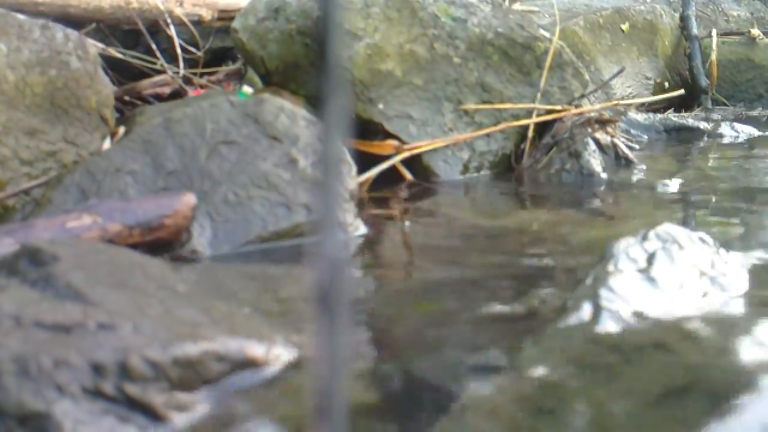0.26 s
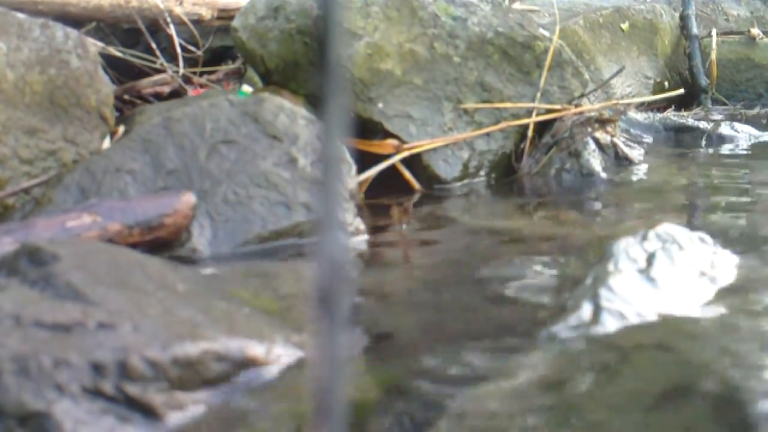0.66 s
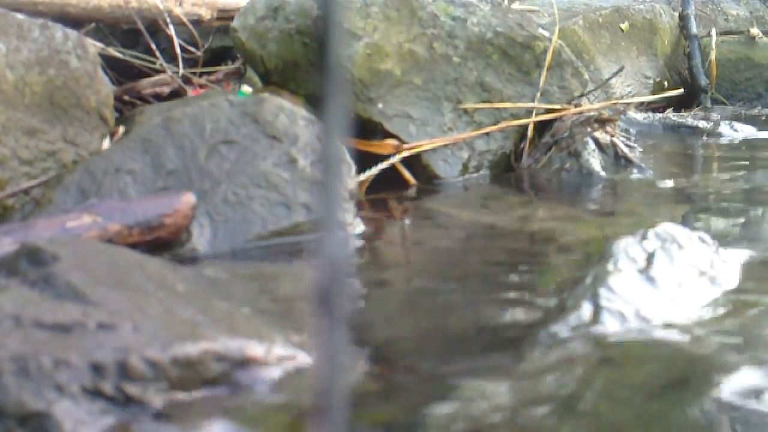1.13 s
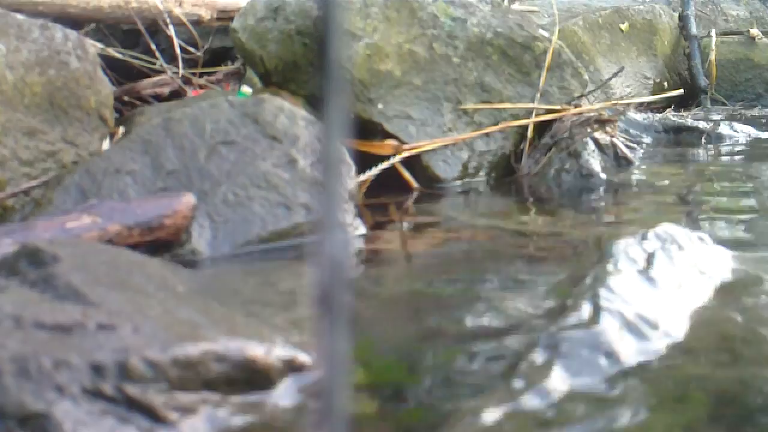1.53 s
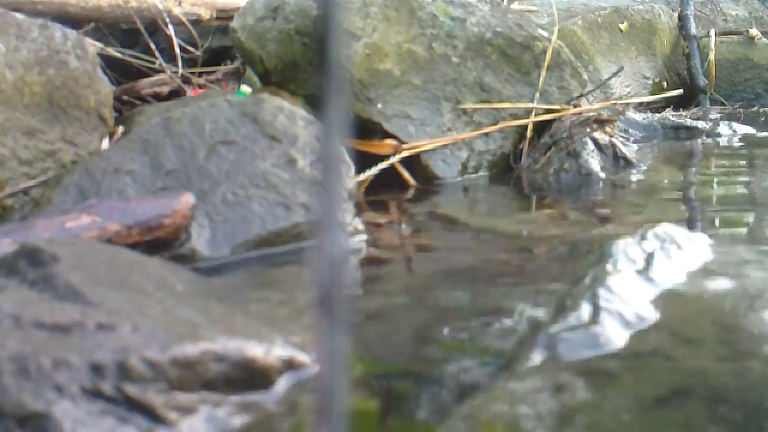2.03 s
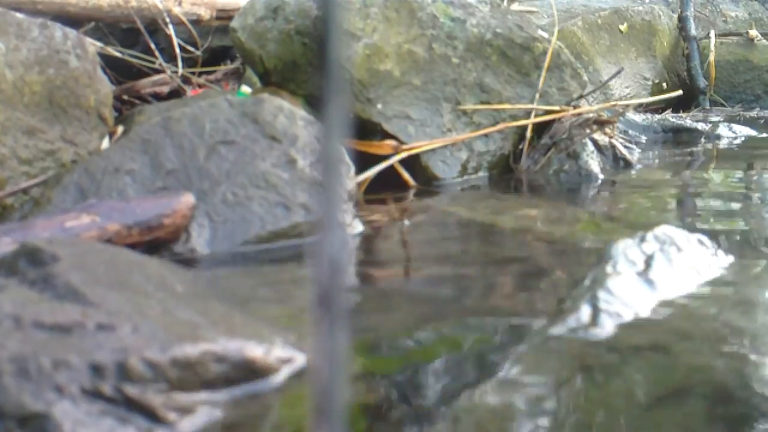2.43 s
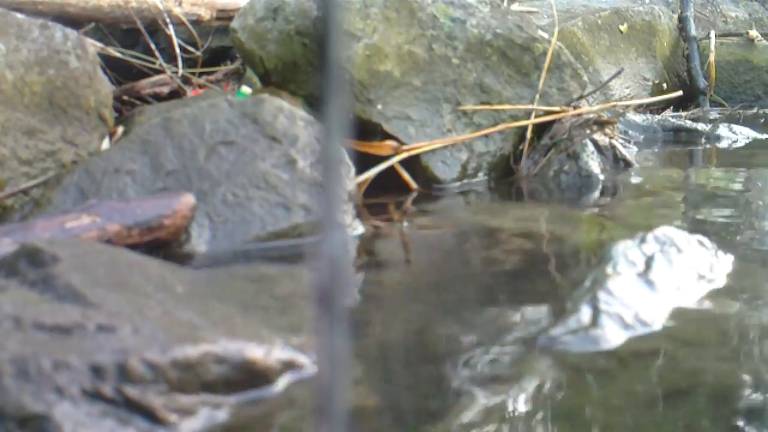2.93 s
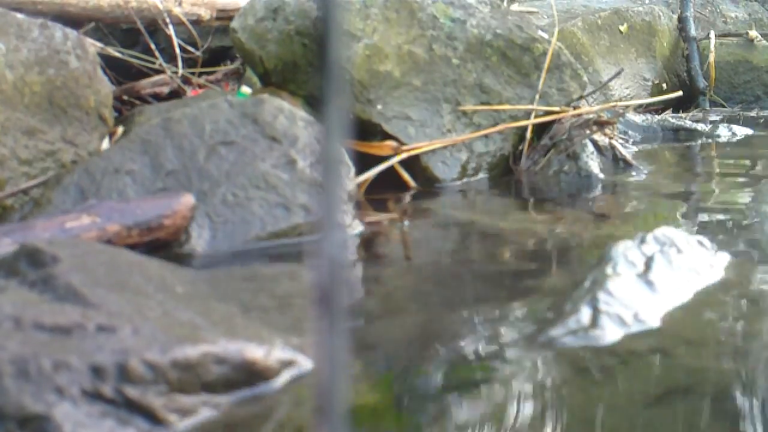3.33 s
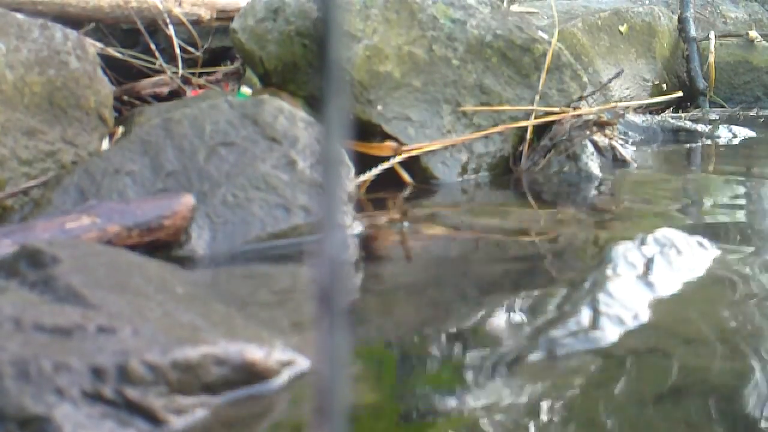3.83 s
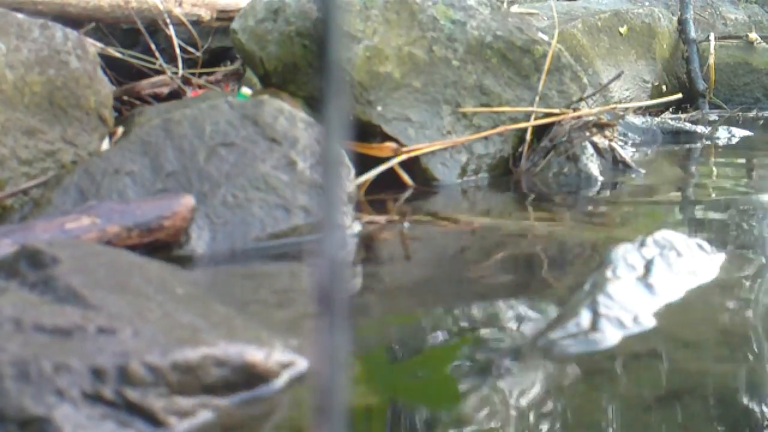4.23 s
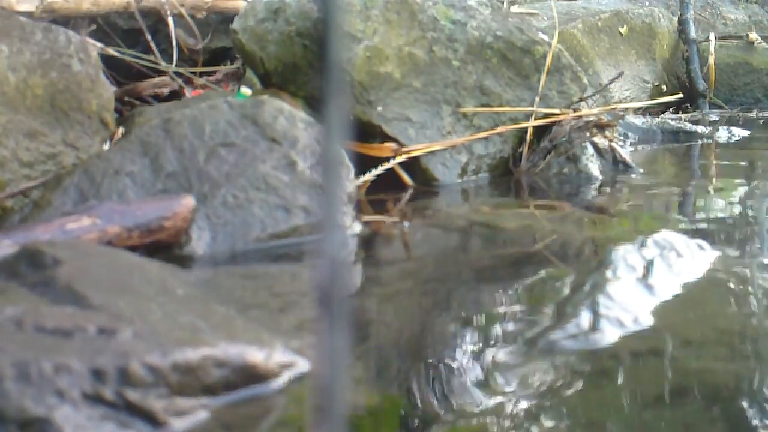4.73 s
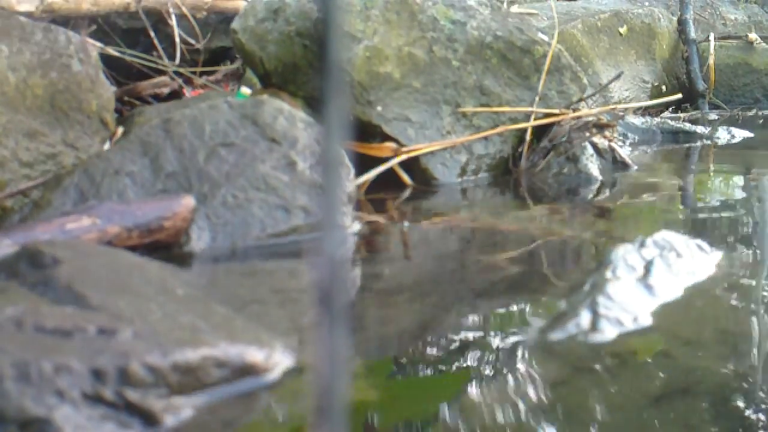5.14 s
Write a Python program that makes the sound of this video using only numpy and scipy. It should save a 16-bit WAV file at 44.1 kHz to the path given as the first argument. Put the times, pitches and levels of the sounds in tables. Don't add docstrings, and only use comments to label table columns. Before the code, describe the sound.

A steady, high, pure electronic whine, around 1.6 kHz with a weaker octave, runs through the whole 5.4 seconds, swelling only very slightly, with a faint fast ticking beneath. Low wind rumble and soft hiss surround it. A distant engine hums low at the start, fades by 1.5 s, and returns from about 4 s, slightly higher. Water laps quietly at hollow floats by the rocks; a soft knock comes near 0.8 s, tiny droplet ticks at 1.2-1.4 s, a slap at 1.65 s and a firmer hollow knock near 2.15 s. From 2.8 to 3.15 s splashes thicken with knocks, froth and crisp spray. Quick slaps follow at 3.35-3.6 s, then wet bubbly knocks around 3.85 and 4.05 s and spatter at 4.3-4.4 s. The loudest event, a clustered deep hollow thump with cracks, lands at 4.6-4.7 s, then lapping subsides. The microphone is close, on the craft.

```python
import sys
import numpy as np
from scipy import signal
from scipy.fft import rfft, irfft
from scipy.io import wavfile
from scipy.ndimage import uniform_filter1d

SR = 44100
rng = np.random.default_rng(int(sys.argv[2]) if len(sys.argv) > 2 else 0)


def invert_db(level):
    return 10 ** (np.asarray(level, dtype=float) / 20)


def wav_record(signal):
    frames = np.transpose(np.atleast_2d(signal))
    bounded = np.clip(frames, -1, 1)
    quanta = np.round(bounded * 32767).astype(np.int16)
    wavfile.write(sys.argv[1], SR, quanta)


N = 237699

# (multiple, level [dB rms])
WHINE_HARMONICS = [(1, -35.9), (2, -50.9), (3, -70.5), (4, -74.5), (5, -74.8), (6, -81)]
# (frequency [Hz], level [dB rms])
CIRCUIT_TONES = [(8077.85, -73), (11088.93, -61)]
SWELL_TIMES_S = [0.287, 0.574, 0.773, 1.035, 1.082, 1.345, 1.387, 1.828, 2.028, 2.182, 2.268, 2.422, 2.6,
                 2.731, 2.798, 2.843, 2.953, 3.062, 3.104, 4.316, 4.845, 4.958, 5.154, 5.196]
SWITCH_HZ, UPDATE_HZ, SWELL_DB = 1602.53, 45.4, 2

# (time [s], frequency [Hz], level [dB rms])
ENGINE_CURVE = [
    (0, 158, -53.5),
    (1.5, 163, -66.5),
    (3, 169, -65.5),
    (4.2, 174, -48),
    (4.75, 177.3, -46.5),
    (5.39, 180, -46.5),
]
# (frequency [Hz], density [dB per Hz])
AIR_SPECTRUM = [(20, -1), (45, 2), (85, 2), (130, -6.5), (250, -10), (500, -21), (1000, -26.5), (2000, -31),
                (3000, -40.5), (4800, -43.5), (5600, -42), (8000, -45.5), (12000, -40), (15500, -53)]
AIR_DB = -39

# (frequency [Hz], width [Hz], level [dB])
FLOAT_MODES = [(161, 47, 0.5), (307, 132, 3.5), (449, 116, 5.5), (600, 196, -2), (750, 250, -12)]
# (frequency [Hz], width [Hz], level [dB])
SHELL_MODES = [(837, 240, 1), (1170, 83, -2), (1240, 88, -1.5), (2160, 570, -5), (2130, 88, 1),
               (2920, 570, -23)]
# (frequency [Hz], width [Hz], level [dB])
FROTH_MODES = [(3210, 600, -2.5), (3700, 260, 0.5), (4100, 1300, -3), (4950, 175, 0.5), (6400, 1900, -11)]
# (frequency [Hz], width [Hz], level [dB])
SPRAY_MODES = [(7920, 920, 4), (9160, 1200, 3.5), (10960, 1200, 4), (12800, 810, 7), (13700, 1700, 4.5)]

# (time [s], level [dB])
RIPPLE_CURVE = [(0, -52), (.48, -47.5), (.95, -48.5), (1.15, -43), (1.5, -44), (1.62, -39), (1.86, -47.5),
                (2.3, -41), (2.67, -45.5), (3.2, -41), (3.48, -42.5), (3.66, -63), (4.0, -65), (4.2, -39.5),
                (4.46, -43), (4.6, -50), (4.75, -47.5), (5.39, -52.5)]
# (crest [s], 20 dB fade [s], slosh level [dB], shell patter re slosh [dB])
WAVE_CRESTS = [(.77, -0.1, -44, -14), (.84, 0.7, -45, -30.5), (1.02, 0.27, -43, -16.5),
               (1.09, 0.04, -37, -21), (1.605, 0.02, -33, -16.5), (2.01, 0.12, -37, -23),
               (2.08, 3, -53, -20), (2.15, 0.1, -33, -27.5), (2.35, 0.03, -32.5, -19),
               (2.43, -0.2, -38.5, -14), (2.58, 0.05, -37, -14), (2.8, 0.15, -32.5, -14),
               (2.87, 0.06, -27.5, -20), (2.91, 0.04, -30.5, -15), (3.0, 0.06, -36, -17),
               (3.05, 0.1, -33.5, -15.5), (3.12, 0.14, -40, -11), (3.44, 0.07, -35, -12),
               (3.53, 0.13, -32.5, -12), (3.59, 0.03, -29.5, -15), (3.825, 0, -27.5, -16),
               (3.87, 0.1, -23.5, -16), (4.065, 0.04, -32.5, -20), (4.16, 0.2, -43.5, -9),
               (4.28, 0.02, -27.5, -23), (4.4, .08, -34, -12.5), (4.61, 0.06, -36.5, -17),
               (4.637, 0.027, -23, -12), (4.67, -0.01, -27, -30)]
# (crest [s], 20 dB fade [s], spray level [dB], froth re spray [dB])
BREAKING_CRESTS = [(.81, -0.2, -59, -4), (.995, 0, -58, 8), (1.02, 0.05, -55, -6), (1.08, -0.1, -53, -6),
                   (1.36, -0.5, -59, -3), (1.97, 0, -54, -6), (2.02, .05, -58.5, 4.5),
                   (2.155, .05, -50, -5.5), (2.36, .2, -59, -1), (2.58, .12, -58, -5), (2.79, 0.34, -55, 3),
                   (2.87, 0.12, -47, 3.5), (2.91, .08, -44, -1.5), (3.01, 0.1, -50.5, -3),
                   (3.08, -0.2, -59, -13), (3.14, 0.08, -53, -1.5), (3.522, 0.1, -44.5, 1.5),
                   (3.54, 0.12, -50, -17), (3.575, 0.4, -61, -14), (3.82, .08, -43.5, -3.5),
                   (3.865, 0.07, -49, 2.5), (3.9, 0.17, -55.5, -1.5), (4.06, 0.08, -53.5, -1.5),
                   (4.16, 0.1, -57, -1), (4.275, 0.06, -51, -2), (4.3, 0.01, -45, -8),
                   (4.325, .05, -46, -2.5), (4.39, 0.06, -44.5, -5), (4.43, 0.13, -55.5, -5),
                   (4.64, 0.01, -53.5, 5)]
CALM_DB = -47
PATTER_DB, PATTER_FOLLOWS = -63, 0.11
FROTH_DB, FROTH_FOLLOWS = -67, 0.9
SPRAY_DB, SPRAY_FOLLOWS = -63.5, 0.5
WAVE_RISE, SPLASH_RISE = 1, 0.7
CREST_ROUNDING = 1.22

# (time [s], peak [dB], hollow pitch [Hz], t60 [s])
SOFT_KNOCKS = [(0.823, -22.5, 312, 0.019), (2.074, -29, 395, 0.036), (2.126, -21, 353, 0.039),
               (2.802, -19.5, 430, 0.033), (2.849, -24, 540, 0.026), (3.067, -19, 336, 0.018),
               (3.586, -18, 567, 0.015), (3.841, -26, 437, 0.093), (4.055, -24, 420, 0.07),
               (4.273, -23.5, 526, 0.017), (4.62, -13.5, 379, 0.061), (4.626, -12, 325, 0.03),
               (4.657, -16, 279, 0.036), (4.687, -20, 251, 0.094)]
# (time [s], peak [dB], hollow pitch [Hz], t60 [s])
SHARP_SLAPS = [(0.763, -31.5, 490, 0.028), (1.651, -26.5, 323, 0.019), (2.158, -15, 252, 0.021),
               (2.882, -28.5, 384, 0.17), (3.007, -30.5, 518, 0.092), (3.099, -26, 542, 0.044),
               (3.344, -24.5, 490, 0.022), (3.377, -23.5, 465, 0.032), (3.401, -21.5, 375, 0.035),
               (3.537, -26, 580, 0.047), (3.573, -19.5, 214, 0.018), (3.864, -19, 344, 0.046),
               (4.047, -35.5, 420, 0.043), (4.605, -24, 600, 0.015), (4.6345, -20, 195, 0.04)]
# (time [s], peak [dB], frequency [Hz], t60 [s])
HEAVES = [
    (2.151, -27, 133, 0.13),
    (4.623, -20, 90, 0.094),
    (4.66, -22, 125, 0.092),
    (4.668, -23, 245, 0.19),
    (4.689, -24.5, 130, 0.16),
    (3.402, -31, 173, .1),
]
# (time [s], peak [dB], frequency [Hz], t60 [s])
BUBBLE_PINGS = [(.824, -31, 576, 0.043), (.992, -46, 4400, .03), (0.992, -49, 5160, .02),
                (.991, -49, 3610, 0.023), (2.863, -34, 4700, 0.034), (2.877, -29.5, 4630, 0.023),
                (3.067, -33, 3350, .015), (3.345, -30.5, 900, 0.023), (3.38, -47, 2140, 0.043),
                (3.408, -45, 2160, 0.045), (3.445, -43, 954, 0.15), (3.512, -36, 2230, 0.034),
                (3.62, -36, 670, 0.028), (3.812, -40, 2250, .05), (3.858, -40.5, 2280, .05),
                (3.866, -22.5, 824, 0.035), (3.898, -31, 1295, 0.065), (4.055, -45.5, 2130, 0.045),
                (4.607, -21, 600, 0.01), (4.628, -25.5, 1120, 0.023), (4.629, -41, 2080, .03),
                (4.622, -22.5, 705, 0.038), (4.636, -19, 1140, 0.017), (4.636, -30, 1960, 0.026),
                (4.6595, -20.5, 600, 0.013)]
KNOCK_CRACK_DB, SLAP_CRACK_DB = 0, 15.5

# (time [s], peak [dB], low part [dB])
DROPLETS = [(1.205, -37, -47.5), (1.28, -36.5, -65), (1.379, -33, -65), (1.4431, -34, -54),
            (2.2493, -37, -58), (2.768, -34, -54), (2.799, -40, -35), (2.878, -30, -31.5),
            (2.903, -22, -30), (2.923, -38, -45), (2.942, -32, -50), (2.981, -30, -50), (2.9973, -30, -33),
            (3.0074, -44, -52), (3.027, -31, -52), (3.0688, -22, -30.5), (3.1004, -35, -44),
            (3.1258, -35, -42), (3.1384, -31.5, -54), (3.208, -40, -40.5), (3.2134, -35, -47),
            (3.4337, -34, -38), (4.146, -30.5, -41), (4.2055, -39, -45), (4.214, -29.5, -58),
            (4.2941, -33, -55), (4.356, -40, -43), (4.382, -26, -39), (4.5052, -32, -60), (4.605, -33, -50)]
PUFF_DECAY_S, DROPLET_HZ, DROPLET_SCATTER_HZ = 0.0014, 12700, 700


def rms_one(x):
    return x / np.sqrt(np.mean(x ** 2) + 1e-20)


def in_time(rows):
    time_s, *columns = np.transpose(rows)
    return [np.interp(np.arange(N) / SR, time_s, column) for column in columns]


def drift(rate_hz):
    pole = np.exp(-2 * np.pi * rate_hz * 40 / SR)
    noise = rng.standard_normal(N // 40 + 2002)
    slow = signal.lfilter([1], [1, -2 * pole, pole * pole], noise)[2000:]
    return np.interp(np.arange(N) / 40, np.arange(len(slow)), rms_one(slow))


def resonate(x, modes):
    out = 0
    for k, (hz, width_hz, db) in enumerate(modes):
        r = np.exp(-np.pi * width_hz / SR)
        poles = [1, -2 * r * np.cos(2 * np.pi * hz / SR), r * r]
        zeros = [(1 - r * r) / 2, 0, (r * r - 1) / 2]
        out = out + (-1) ** k * invert_db(db) * signal.lfilter(zeros, poles, x)
    return out


def dull(x, hz):
    return signal.sosfilt(signal.butter(2, hz, fs=SR, output="sos"), x)


def whine():
    t = np.arange(N) / SR
    held_db = np.zeros(N)
    half = round(SR / UPDATE_HZ / 2)
    for time_s in SWELL_TIMES_S:
        at = round(time_s * SR)
        held_db[at - half:at + half] = SWELL_DB
    swell_db = uniform_filter1d(held_db, size=400)
    out = sum(invert_db(db) * np.sin(2 * np.pi * hz * t) for hz, db in CIRCUIT_TONES)
    for k, db in WHINE_HARMONICS:
        wobble_db = swell_db + 0.2 * drift(12) if k == 1 else 0.9 * drift(3)
        out = out + invert_db(db + wobble_db) * np.sin(2 * np.pi * k * SWITCH_HZ * t + k)
    return np.sqrt(2) * out


def chatter():
    updates = np.diff(np.floor(np.arange(N) / SR * UPDATE_HZ + 0.6), prepend=0)
    jolts = signal.lfilter([1], [1, -0.99], updates * invert_db(3.5 * drift(29)))
    puffs = jolts * rng.standard_normal(N)
    casing = [(2580, 1450, 0)]
    return invert_db(-65.5) * rms_one(resonate(resonate(puffs, casing), casing))


def drone():
    hz, db = in_time(ENGINE_CURVE)
    return np.sqrt(2) * invert_db(db + 1.2 * drift(3)) * np.sin(2 * np.pi * np.cumsum(hz) / SR)


def background():
    hz = np.fft.rfftfreq(N, 1 / SR)
    curve_hz, curve_db = np.transpose(AIR_SPECTRUM)
    colour = invert_db(np.interp(np.log(hz + 1), np.log(curve_hz), curve_db))
    air = rms_one(irfft(rfft(rng.standard_normal(N)) * colour * (hz > 15), N))
    rumble = dull(air, hz=194)
    return invert_db(AIR_DB) * (air + rumble * (invert_db(0.89 * drift(15)) - 1))


def grains(per_s, spread_db):
    sizes = invert_db(spread_db * np.minimum(rng.exponential(1, N), 4)) * rng.choice([-1, 1], N)
    return sizes * (rng.random(N) < per_s / SR) + 1e-18


def patter(per_s, spread_db, modes, patchy_db):
    shared = grains(per_s, spread_db)
    out = 0
    for k, mode in enumerate(modes):
        fed = shared + 1.49 * np.roll(shared, 9973 * (k + 1))
        out = out + (-1) ** k * resonate(fed, [mode]) * invert_db(patchy_db * drift(9))
    return rms_one(out)


def surges(rows, rise, between_db):
    t = np.arange(N) / SR
    power = invert_db(np.array(between_db)) ** 2
    for crest_s, fade_s, db, second_db in rows:
        distance_s = np.maximum(t - crest_s, (crest_s - t) / rise)
        fall_db = -20 * (distance_s / max(fade_s, 0.01)) ** CREST_ROUNDING
        surge = invert_db(np.maximum(fall_db, -80) + db) ** 2
        power = power + surge * [[1], [invert_db(second_db) ** 2]]
    return np.sqrt(power)


def lapping():
    ripple_db, = in_time(RIPPLE_CURVE)
    swing_db = ripple_db - CALM_DB
    patter_db = PATTER_DB + PATTER_FOLLOWS * swing_db
    spray_db = SPRAY_DB + SPRAY_FOLLOWS * swing_db
    froth_db = FROTH_DB + FROTH_FOLLOWS * swing_db
    slosh, shell = surges(WAVE_CRESTS, WAVE_RISE, [ripple_db, patter_db])
    spray, froth = surges(BREAKING_CRESTS, SPLASH_RISE, [spray_db, froth_db])
    clumps = drift(45)
    slosh = slosh * dull(patter(500, 3.7, FLOAT_MODES, patchy_db=0.5), hz=1010) * invert_db(2.4 * clumps - 4)
    shell = shell * dull(patter(600, 2.15, SHELL_MODES, patchy_db=4.5), hz=2630) * invert_db(2.7 * clumps + 1)
    froth = froth * patter(1500, 4, FROTH_MODES, patchy_db=2) * invert_db(2 * clumps)
    spray = spray * patter(4000, 5, SPRAY_MODES, patchy_db=1.5) * invert_db(1.75 * clumps + 1)
    return slosh + shell + froth + spray


def add_ring(out, time_s, db, hz, t60_s, rise_s):
    t = np.arange(SR // 4) / SR
    shape = (1 - np.exp(-t / rise_s)) ** 2 * invert_db(-60 * t / max(t60_s, 0.01))
    out[round(time_s * SR):][:len(t)] += invert_db(db) * shape / shape.max() * np.sin(2 * np.pi * hz * t)


def knocks():
    out = np.zeros(N)
    cracks = np.zeros(N) + 1e-18
    for blows, crack_db in (SOFT_KNOCKS, KNOCK_CRACK_DB), (SHARP_SLAPS, SLAP_CRACK_DB):
        for time_s, db, hz, t60_s in blows:
            add_ring(out, time_s, db, hz, t60_s, rise_s=0.00076)
            cracks[round(time_s * SR) + 90] = invert_db(db + crack_db)
    for heave in HEAVES:
        add_ring(out, *heave, rise_s=0.0012)
    for ping in BUBBLE_PINGS:
        add_ring(out, *ping, rise_s=0.00049)
    return out + dull(resonate(cracks, SHELL_MODES), hz=2570)


def ticks():
    high = np.zeros(N)
    low = np.zeros(N) + 1e-18
    t = np.arange(900) / SR
    for time_s, db, low_db in DROPLETS:
        at = round(time_s * SR)
        noise = rng.standard_normal(len(t))
        puff = noise * np.exp(-t / PUFF_DECAY_S)
        hz = DROPLET_HZ + DROPLET_SCATTER_HZ * np.clip(noise[-1], -2, 2)
        bright = resonate(puff, [(hz, 2600, 0)]) + invert_db(-7) * resonate(puff, SPRAY_MODES)
        high[at:at + len(t)] += invert_db(db + 0.5) * bright
        low[at:at + len(t)] += invert_db(low_db + 11.5) * puff
    return high + resonate(low, FROTH_MODES)


def scene():
    craft = whine() + chatter()
    water = lapping() + knocks() + ticks()
    distance = drone() + background()
    return (craft + water + distance)[None, :]


def band_limit(x):
    return signal.sosfilt(signal.butter(12, 15800, fs=SR, output="sos"), x)


def record(dry):
    top_cut = signal.ellip(8, 0.5, 32, 15300, fs=SR, output="sos")
    mix = signal.sosfilt(top_cut, dry)
    return band_limit(mix)


dry = scene()
out = record(dry)
wav_record(out)
```